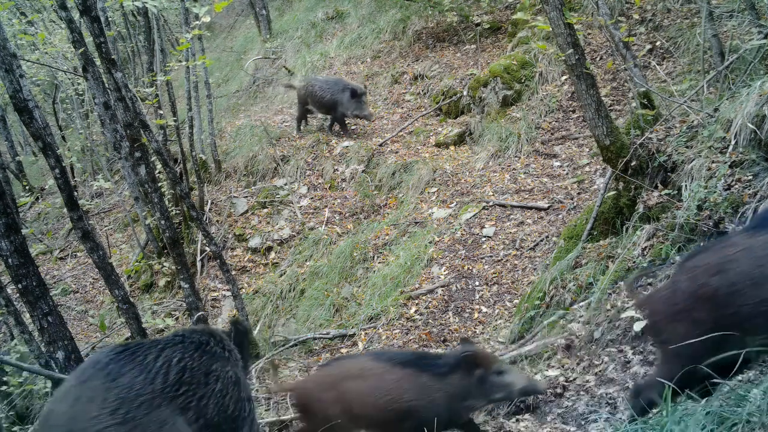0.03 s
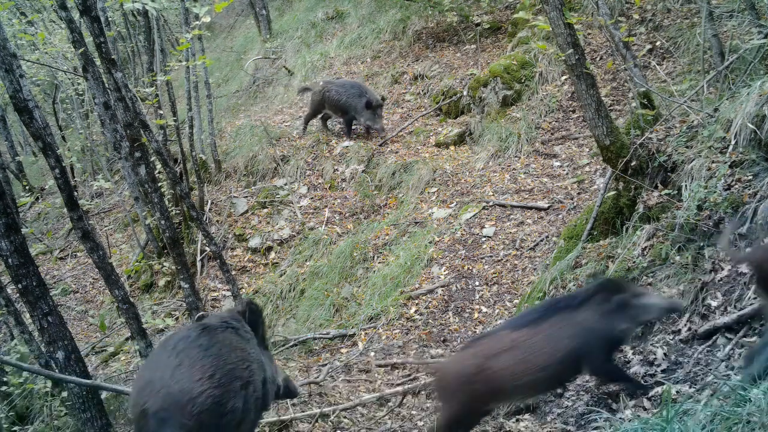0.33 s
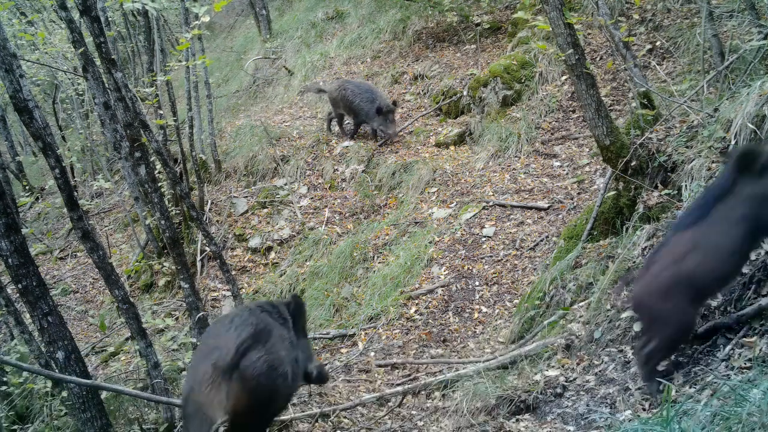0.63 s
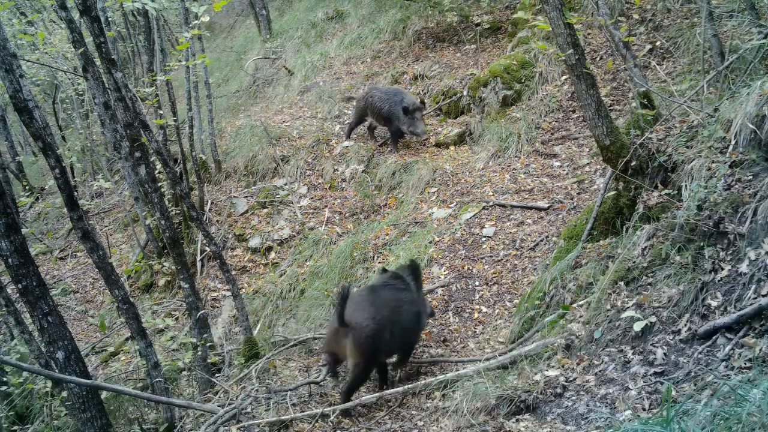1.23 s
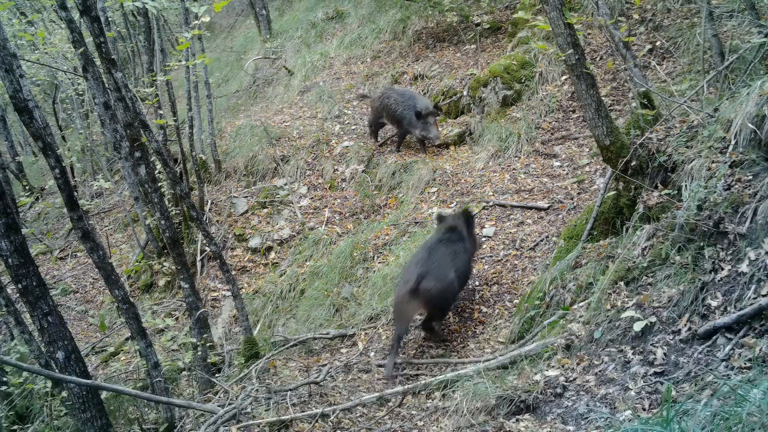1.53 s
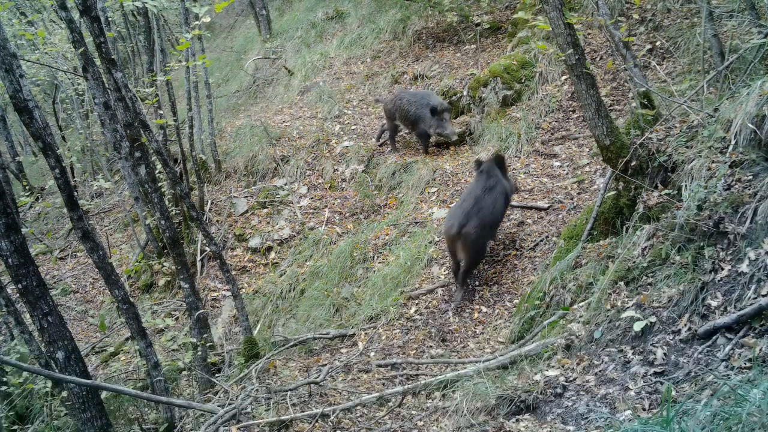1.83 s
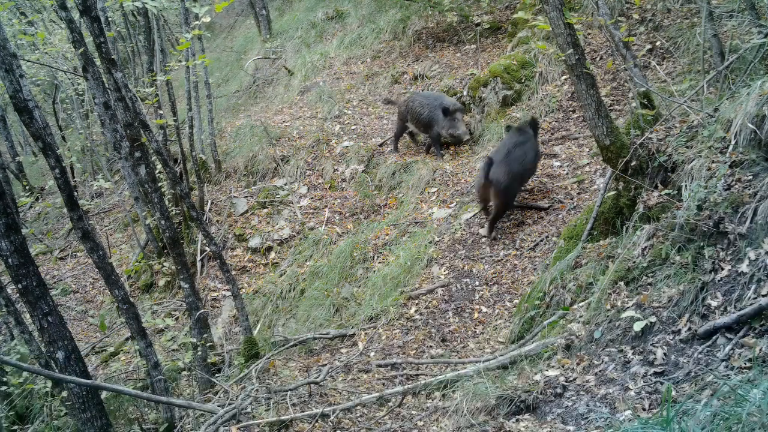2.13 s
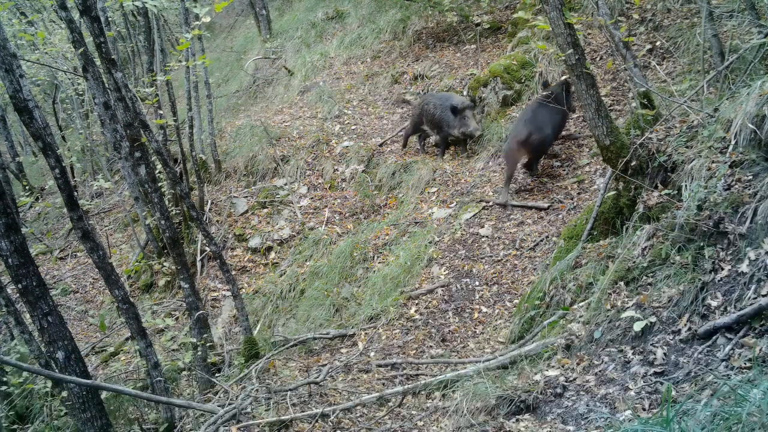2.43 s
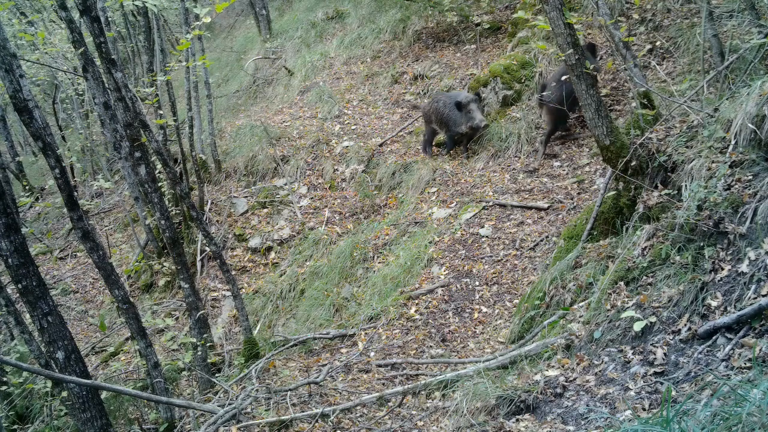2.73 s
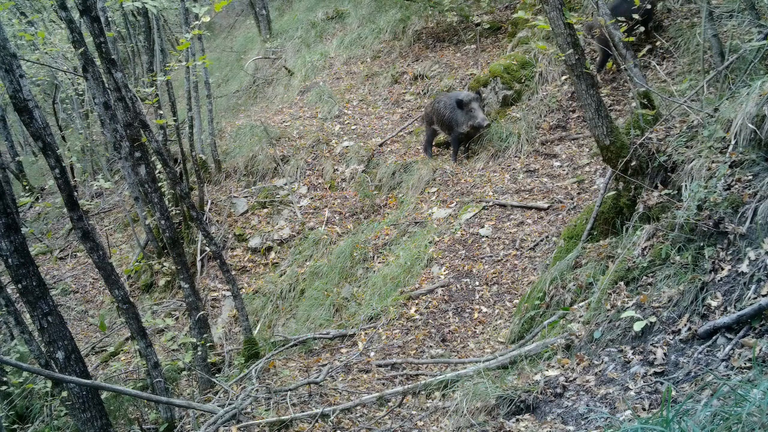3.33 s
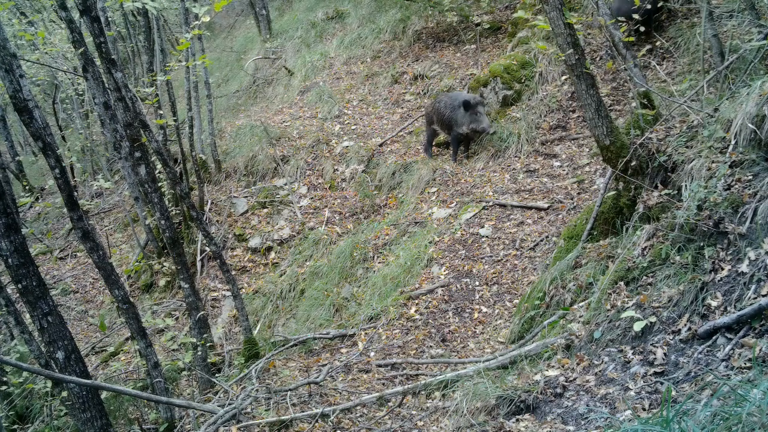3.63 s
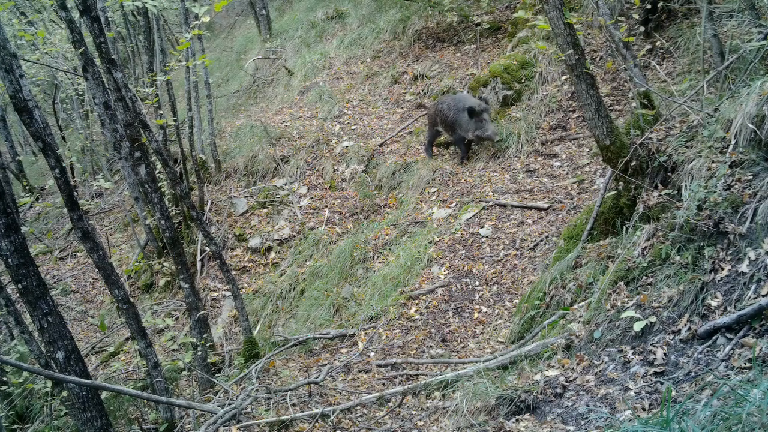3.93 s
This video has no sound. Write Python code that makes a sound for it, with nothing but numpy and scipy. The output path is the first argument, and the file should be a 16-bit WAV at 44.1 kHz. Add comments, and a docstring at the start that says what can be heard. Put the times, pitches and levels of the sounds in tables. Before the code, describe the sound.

Wild boars trample dry leaves and snap twigs, giving low grunts as they move off.

```python
"""Dry leaves crash close to the microphone as wild boars bolt past and run off up a wooded slope.
Each footfall crushes a burst of tiny leaf fractures; twigs snap, near hooves thud on the soil and one
stick breaks. Low growling grunts, throat pulses with a rasp and a ringing snout, carry on as the
rustle recedes uphill into a faint rumble of air. The trunks give the leaves and wood a short tail."""
import sys
import numpy as np
from scipy import signal
from scipy.fft import rfft, irfft, next_fast_len
from scipy.io import wavfile
from scipy.ndimage import uniform_filter1d, map_coordinates

SR = 44100
rng = np.random.default_rng(int(sys.argv[2]) if len(sys.argv) > 2 else 0)


def wav_record(signal):
    """Record a signal, one row per channel, as 16-bit PCM in the file named by sys.argv[1]."""
    frames = np.transpose(np.atleast_2d(signal))
    bounded = np.clip(frames, -1, 1)
    # unit amplitude maps onto the largest positive 16-bit level
    quanta = np.round(bounded * 32767).astype(np.int16)
    wavfile.write(sys.argv[1], SR, quanta)


N = 176400
T = np.arange(N) / SR


def amp(db):
    """Decibels to gain."""
    return 10 ** (np.asarray(db) / 20)


def unit(x):
    """Scale to rms 1."""
    return x / np.sqrt(np.mean(x ** 2) + 1e-20)


def curve(points):
    """Straight lines in time through (time_s, value) points."""
    return np.interp(T, *np.transpose(points))


def wobble(knots_per_s):
    """A smooth random curve."""
    return map_coordinates(rng.standard_normal(2000), [T * knots_per_s + 2], mode="wrap")


def colour(x, points):
    """Minimum-phase filter through (frequency_hz, gain_db) points."""
    size = 2 * next_fast_len(N // 2 + SR // 4)
    hz, db = np.transpose(points)
    gain = amp(np.interp(np.log(np.fft.rfftfreq(size, 1 / SR) + 1), np.log(hz), db))
    cepstrum = irfft(np.log(gain), size)
    cepstrum[1:size // 2] *= 2
    cepstrum[size // 2 + 1:] = 0
    return irfft(rfft(x, size) * np.exp(rfft(cepstrum)), size)[:N]


def resonance(x, hz, width_hz):
    """A resonance whose centre follows the curve hz; white noise keeps its rms."""
    turn = np.exp(2j * np.pi * np.cumsum(hz) / SR)
    pole = np.exp(-np.pi * width_hz / SR)
    return np.real(turn * signal.lfilter([np.sqrt(2 * (1 - pole ** 2))], [1, -pole], x / turn))


def fractures(spectrum, per_s, spread_db, hiss):
    """Tiny leaf fractures of uneven size over a smooth sliding hiss, coloured and scaled to rms 1."""
    hits = rng.random(N) < per_s / SR
    size = amp(spread_db * np.minimum(rng.exponential(size=N), 4.5))
    clicks = unit(hits * size * rng.choice([-1, 1], N))
    return unit(colour(clicks + hiss * rng.standard_normal(N), spectrum))


def leaf_variety(x, depth_db):
    """Different leaves give each instant a slightly different colour."""
    spectra = signal.stft(x, nperseg=512)[2]
    patches = rng.standard_normal(spectra.shape)
    for _ in range(2):
        patches = uniform_filter1d(uniform_filter1d(patches, size=11, axis=0), size=7, axis=1)
    return signal.istft(spectra * amp(depth_db * unit(patches)), nperseg=512)[1][:N]


# Leaves stirring between footfalls, fainter with distance: time_s, level_db
LEAF_STIR = [(0, -40), (.3, -39.5), (.5, -43.5), (.72, -39), (.95, -42), (1.35, -44), (1.62, -44),
             (1.73, -50), (2.1, -45), (2.29, -49), (2.42, -49.5), (2.7, -48.5), (2.88, -52.5), (3.12, -53),
             (3.22, -53.5), (3.68, -56), (3.8, -57)]
# Footfalls, from beside the microphone to far up the slope: crest_s, level_db, decay_s, brightness_db
FOOTFALLS = [(.005, -26.5, 0.019, -2), (.021, -33, 0.023, -5.5), (0.111, -36, 0.032, -2),
             (.21, -43, 0.12, -10.5), (.26, -34.5, 0.026, 0), (.335, -39, 0.13, -2),
             (.39, -38.5, 0.038, 1.5), (.59, -40, 0.016, -3.5), (0.676, -35, 0.045, -2.5),
             (0.774, -35.5, 0.023, -4), (.852, -39, 0.11, 2), (.945, -38.5, 0.079, -2.5),
             (0.986, -34.5, 0.024, -0.5), (1.08, -39, 0.029, -0.5), (1.165, -43.5, 0.077, -2.5),
             (1.235, -41, 0.028, -1), (1.268, -31, 0.039, -0.5), (1.375, -53.5, 0.015, 15),
             (1.43, -42.5, 0.026, -1), (1.497, -41, 0.014, -4.5), (1.557, -40.5, 0.027, -3),
             (1.635, -47.5, 0.066, -8.5), (1.791, -41, 0.03, 1.5), (1.897, -43, 0.023, -2.5),
             (2.052, -43, 0.026, -3), (2.203, -42.5, 0.016, -1.5), (2.33, -48, 0.034, 3),
             (2.385, -44, 0.096, -0.5), (2.455, -46, 0.028, -4), (2.501, -45, 0.0079, 5),
             (2.595, -45.5, 0.02, -3), (2.725, -54.5, 0.069, -12.5), (2.821, -45.5, 0.024, -8),
             (3.085, -56, 0.042, 3), (3.325, -55.5, 0.18, 5), (3.59, -49.5, 0.081, -1),
             (3.69, -52, 0.047, 0), (3.96, -53.5, .04, -6)]
# Spectra of the low, middle and high layers of the rustle: frequency_hz, gain_db
CRUSH_SPECTRUM = [(100, 1.5), (250, -6), (500, -1.5), (900, -1), (1400, 1.5), (2000, 3), (2700, 1.5),
                  (4000, -0.5), (8000, -10)]
CRACKLE_SPECTRUM = [(800, -50), (2000, -6.5), (3000, -4), (4300, 0.5), (5600, 1), (7000, -4), (9000, -10),
                    (15000, -11.5)]
FIZZ_SPECTRUM = [(3000, -60), (6000, -5), (7800, -1.5), (10000, -1.5), (12000, -2.5), (14000, -4),
                 (15800, -21)]
# Rise and fall of the high layer: time_s, gain_db
FIZZ_GAIN = [(0, -6), (.4, -4), (.9, -4.5), (1.3, -4), (2.2, -4), (3.1, -1.5), (3.3, -6.5), (4, -3)]


def leaves(rise_s=0.023):
    """Footfalls and stirring on the wood's floor drive three layers of fractures: crush, crackle, fizz."""
    stir = amp(curve(LEAF_STIR) + 0.31 * wobble(23.3))

    def effort(tilt):
        """Stirring and footfalls add in power; a positive tilt favours the bright steps."""
        power = stir ** 2
        for crest_s, level_db, decay_s, brightness_db in FOOTFALLS:
            age = T - crest_s
            burst = np.exp(-(np.minimum(age, 0) / rise_s) ** 2 - np.maximum(age, 0) / decay_s)
            power += (amp(level_db + tilt * brightness_db) * burst) ** 2
        return np.sqrt(power)

    flutter = amp(0.57 * wobble(260))
    crush = fractures(CRUSH_SPECTRUM, per_s=1400, spread_db=2.5, hiss=0.57)
    crush *= amp(-7.5 + 0.66 * wobble(40.34)) * effort(tilt=-0.97)
    crackle = fractures(CRACKLE_SPECTRUM, per_s=4000, spread_db=1.6, hiss=0.7)
    crackle *= amp(-2.5 + wobble(60)) * effort(tilt=0)
    fizz = fractures(FIZZ_SPECTRUM, per_s=3500, spread_db=4.0, hiss=1.0)
    fizz *= amp(curve(FIZZ_GAIN)) * effort(tilt=1)
    return leaf_variety(crush + crackle + fizz, depth_db=1.5) * flutter


# Spectrum of the air on the hillside: frequency_hz, gain_db
AIR_SPECTRUM = [(10, 1), (45, -0.5), (90, -9), (150, -13.5), (300, -24), (700, -25), (2000, -26.5),
                (6000, -45.5)]
# Its slow swells at the microphone: time_s, level_db
AIR_LEVEL = [(0, -49.5), (.75, -44.5), (1.7, -48), (2.1, -51.5), (2.8, -49.5), (4, -54)]


def air_rumble(swing_db=1.8):
    """Low, unsteady air movement on the hillside, behind everything else."""
    rumble = unit(colour(rng.standard_normal(N), AIR_SPECTRUM))
    return rumble * amp(curve(AIR_LEVEL) + swing_db * wobble(9.1))


def trunk_scatter(x, t60_s=0.3, build_s=0.013, gain_db=-12):
    """The surrounding trunks scatter a short, faint tail back to the microphone."""
    t = np.arange(SR // 2) / SR
    tail = rng.standard_normal(len(t)) * amp(-60 * t / t60_s) * (1 - np.exp(-t / build_s))
    return amp(gain_db) * signal.fftconvolve(x, tail / np.linalg.norm(tail))[:N]


# Twigs snapping underfoot on the nearer ground: start_s, level_db, pitch_hz, t60_s
TWIG_SNAPS = [(0.0207, -17, 4200, 0.0082), (0.099, -24, 2200, 0.017), (.1135, -16, 4360, 0.006),
              (0.2042, -26.5, 2440, 0.023), (.343, -32, 1960, 0.04), (0.355, -32.5, 1950, 0.13),
              (0.762, -15, 5500, 0.017), (.855, -24, 9800, .012), (.894, -25, 5260, 0.028),
              (0.9972, -19.5, 8400, 0.0079), (1.261, -13, 4400, 0.012), (1.606, -27, 3900, 0.006),
              (1.671, -33.5, 1930, 0.028), (2.063, -30.5, 1810, 0.025), (2.192, -24, 8260, 0.014),
              (2.269, -34, 1720, 0.042)]


def twigs(relative_width=0.085, gain_db=-6.5):
    """Each snap is a short, broad ring at the twig's pitch and a sharp crack a fifth as long."""
    out, t = np.zeros(N + SR), np.arange(SR // 20) / SR
    hz = np.fft.rfftfreq(len(t), 1 / SR)
    for start_s, level_db, pitch_hz, t60_s in TWIG_SNAPS:
        damping = 1j * hz * pitch_hz * relative_width
        band = damping / (pitch_hz ** 2 - hz ** 2 + damping)
        ring = unit(irfft(rfft(rng.standard_normal(len(t))) * band, len(t))) * amp(-60 * t / t60_s)
        crack = rng.standard_normal(len(t)) * amp(-60 * t / (0.2 * t60_s))
        out[round(start_s * SR):][:len(t)] += amp(level_db + gain_db) * (ring + 0.95 * crack)
    return out[:N]


# Hooves landing near enough to thud: crest_s, level_db
HOOF_THUDS = [(0.203, -41), (0.651, -42.5), (0.665, -38.5), (0.737, -42), (0.862, -47), (0.989, -43),
              (1.256, -42), (1.604, -45), (1.667, -47), (2.024, -45), (3.375, -47.5)]
# Spectrum of the struck soil: frequency_hz, gain_db
SOIL_SPECTRUM = [(20, -2), (45, -14), (90, 2), (160, -0.5), (350, -10.5), (700, -9), (1200, -20.5),
                 (3000, -44)]


def hooves(rise_s=0.0068, decay_s=0.0089):
    """Dull blows on soft soil, each a quick swell of low noise."""
    force = np.zeros(N)
    for crest_s, level_db in HOOF_THUDS:
        age = T - crest_s
        force += amp(level_db) * np.exp(np.minimum(age, 0) / rise_s - np.maximum(age, 0) / decay_s)
    return force * unit(colour(rng.standard_normal(N), SOIL_SPECTRUM))


# Grunts, passing and then uphill: start_s, length_s, level_db, first_hz, last_hz, roughness, snout_hz
BOAR_GRUNTS = [(0.29, 0.25, -49, 70, 74.6, 0.4, 268), (0.837, 0.073, -37, 89.2, 84, 0.32, 285),
               (1.195, 0.11, -39.5, 97, 78.2, 0.58, 290), (1.341, 0.15, -41, 78.9, 73.4, 0.73, 245),
               (1.902, 0.1, -43, 84, 88.5, 0.46, 343), (1.957, 0.097, -33, 88.1, 68, 0.19, 302),
               (2.047, 0.12, -41, 70, 77.1, 0.43, 318), (2.572, 0.12, -46.5, 72.2, 79.5, 0.46, 320),
               (2.643, 0.089, -36, 80.8, 70.4, 0.33, 340), (2.714, 0.11, -41.5, 67.2, 68.6, 0.5, 325),
               (2.797, 0.13, -51.5, 72, 70.4, 0.56, 285), (3.199, 0.2, -45, 83.9, 78.3, 0.28, 310),
               (3.385, 0.2, -46.5, 91.3, 81.6, 0.31, 294), (3.569, 0.2, -47.5, 74.7, 62.4, 0.43, 319)]
# Spectra of the throat's pulses and of its rasp: frequency_hz, gain_db
THROAT_SPECTRUM = [(10, -77), (50, 5.5), (78, -3), (110, -0.5), (160, -19), (230, -22), (430, -33),
                   (1200, -81)]
RASP_SPECTRUM = [(25, -28), (70, -11), (120, 9.5), (200, 0), (430, -11), (600, -37), (1200, -28)]


def grunts(edge_s=0.045, jitter=0.072, scatter_db=2, rasp_db=-4, snout_db=-7, snout_q=6.2):
    """Slow, uneven throat pulses and a rasp that opens once a cycle; the snout's ring follows the mouth."""
    pulses, rasp_level, snout = np.zeros((3, N))
    drift, pulse_size, breath = wobble(60), wobble(70), rng.standard_normal(N)
    for start_s, length_s, level_db, first_hz, last_hz, roughness, snout_hz in BOAR_GRUNTS:
        end_s = start_s + length_s
        fade = np.clip(np.minimum(T - start_s, end_s - T) / edge_s, 0, 1)
        level = amp(level_db) * np.sin(fade * np.pi / 2) ** 1.5
        pitch_hz = np.interp(T, [start_s, end_s], [first_hz, last_hz]) * (1 + jitter * roughness * drift)
        cycles = np.cumsum(pitch_hz * (T > start_s)) / SR
        beats = (np.diff(np.floor(cycles), prepend=0) > 0) * amp(scatter_db * roughness * pulse_size)
        pulses += beats * level * SR / pitch_hz / np.sqrt(2)
        opening = 1 + 0.5 * np.cos(2 * np.pi * cycles)
        rasp_level += level * roughness * opening
        gape = np.sin(np.pi * np.clip((T - start_s) / length_s, 0, 1))
        ring_hz = snout_hz * (0.64 + 0.36 * gape)  # highest with the mouth wide open
        drive = beats * np.sqrt(SR / pitch_hz) + 0.65 * opening * breath
        snout += level * roughness * resonance(drive, ring_hz, snout_hz / snout_q)
    rasp = rasp_level * unit(colour(breath, RASP_SPECTRUM))
    return colour(pulses, THROAT_SPECTRUM) + amp(rasp_db) * rasp + amp(snout_db) * snout


# Fibres splitting in one stick on the slope: start_s, ring_db, crack_db
FIBRE_SPLITS = [(1.25, -23, -26), (1.2546, -24, -39), (1.2607, -29, -13.5), (1.2665, -44, -20),
                (1.278, -32, -40)]
# The stick's ringing modes: pitch_hz, gain_db, t60_s
STICK_MODES = [(1600, -10, 0.046), (1980, -11, 0.037), (2140, -3, 0.042), (3340, -8, 0.029),
               (4600, -14, 0.02)]


def stick(crack_band_hz=(2800, 10500), crack_t60_s=0.0068):
    """A stick gives way fibre by fibre: the first splits ring its modes, then it parts with a crack."""
    out, t = np.zeros(N + SR), np.arange(SR // 8) / SR
    band = signal.butter(1, crack_band_hz, "bandpass", fs=SR)
    for start_s, ring_db, crack_db in FIBRE_SPLITS:
        ring = np.zeros(len(t))
        for pitch_hz, gain_db, t60_s in STICK_MODES:
            decay = amp(gain_db + rng.normal(0, 2.2) - 60 * t / t60_s)
            phase_walk = np.cumsum(rng.normal(0, 0.084, len(t)))  # roughens the tone
            ring += decay * np.sin(2 * np.pi * pitch_hz * t + phase_walk)
        crack = signal.lfilter(*band, rng.standard_normal(len(t))) * amp(-60 * t / crack_t60_s)
        out[round(start_s * SR):][:len(t)] += amp(ring_db) * ring + amp(crack_db) * crack
    return out[:N]


# Hooves sliding in the litter, farther uphill: crest_s, half_length_s, level_db, centre_hz
HOOF_SCUFFS = [(2.46, 0.027, -43, 4430), (2.977, .028, -52, 4000), (3.401, 0.037, -55, 1400)]


def scuffs(width_hz=2900):
    """A sliding hoof drags leaves over each other in one smooth swell, bright or dull."""
    out = np.zeros(N)
    for crest_s, half_length_s, level_db, centre_hz in HOOF_SCUFFS:
        band = signal.iirpeak(centre_hz, centre_hz / width_hz, SR)
        hiss = signal.lfilter(*band, signal.lfilter(*band, rng.standard_normal(N)))
        swell = np.exp(-((T - crest_s) / half_length_s) ** 2)
        out += amp(level_db) * swell * unit(hiss)
    return out


def scene():
    """One microphone among the trees: leaves and breaking wood over hooves, grunts and moving air."""
    litter = leaves() + scuffs() + twigs() + stick()
    return (litter + trunk_scatter(litter) + hooves() + grunts() + air_rumble())[None]


def record(dry):
    """The camera's microphone channel keeps nothing above its band limit."""
    top_hz = 15750
    size = next_fast_len(N + SR // 4)
    passband = np.fft.rfftfreq(size, 1 / SR) < top_hz
    return irfft(rfft(dry, size) * passband, size)[..., :N]


dry = scene()
out = record(dry)
wav_record(out)
```